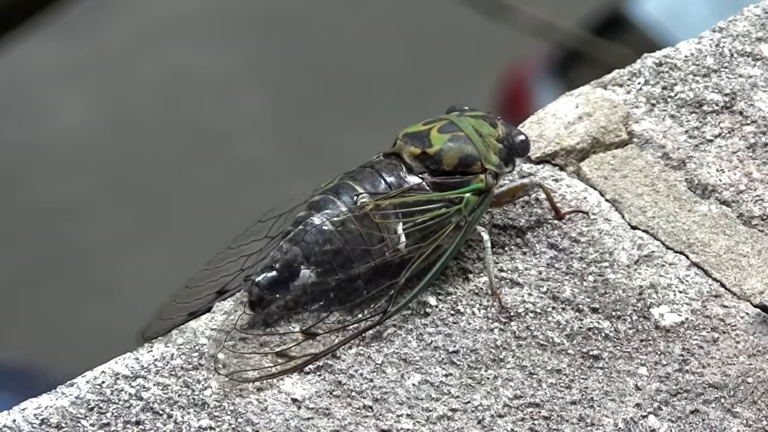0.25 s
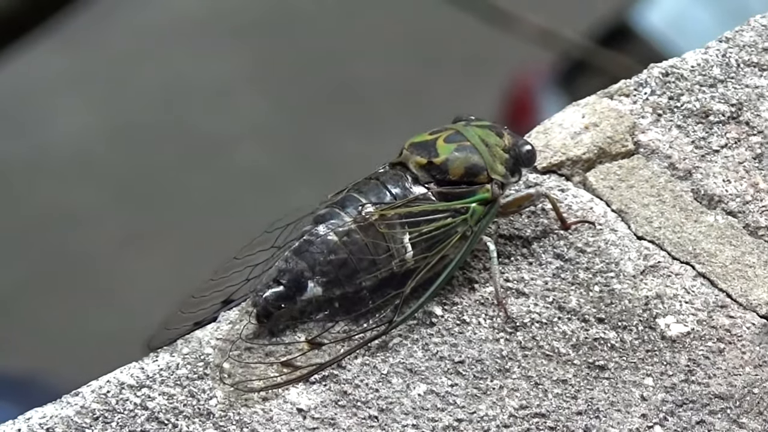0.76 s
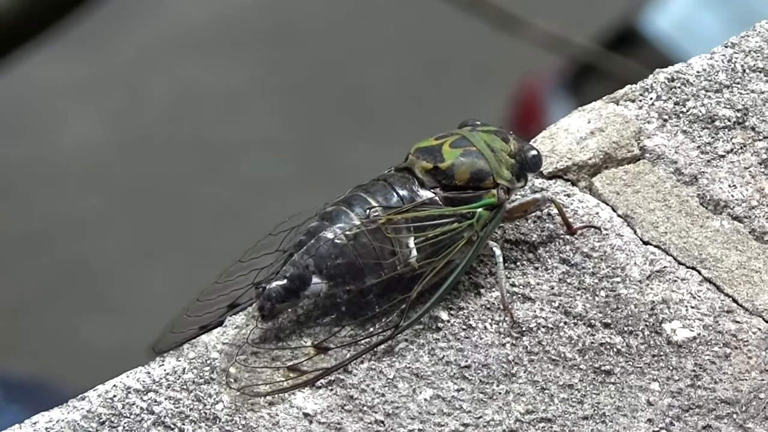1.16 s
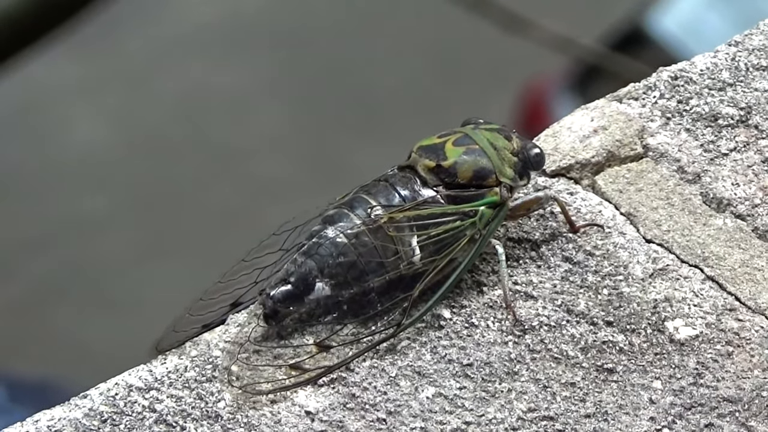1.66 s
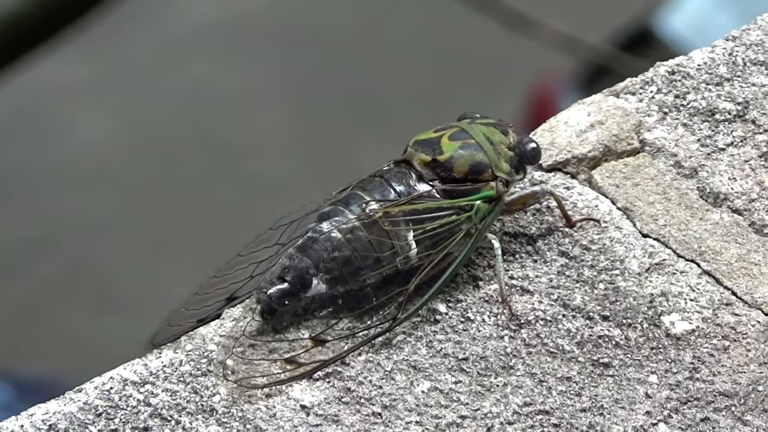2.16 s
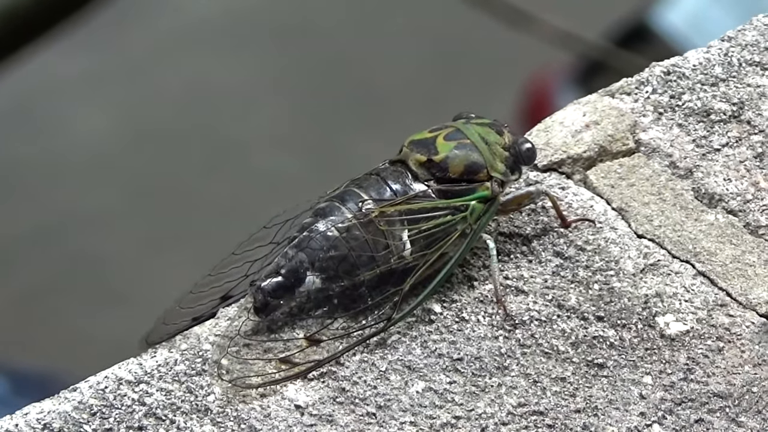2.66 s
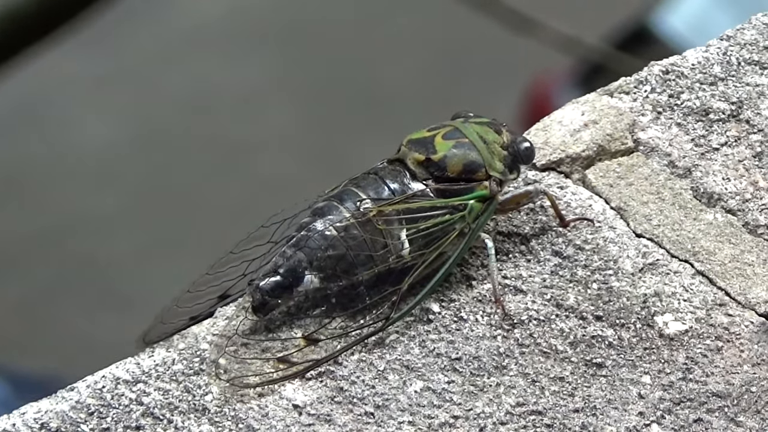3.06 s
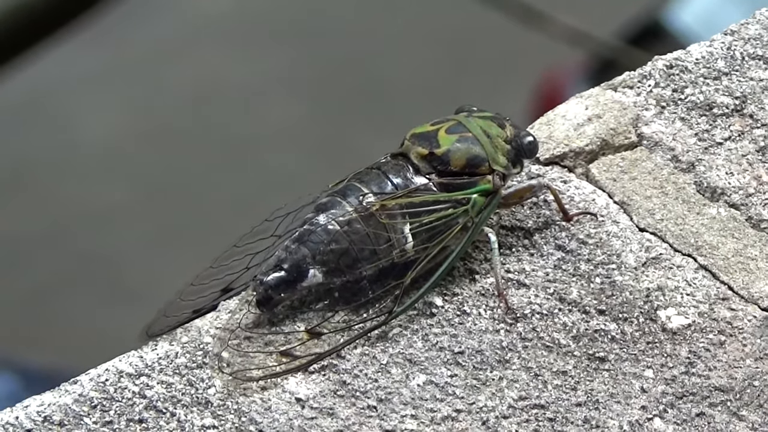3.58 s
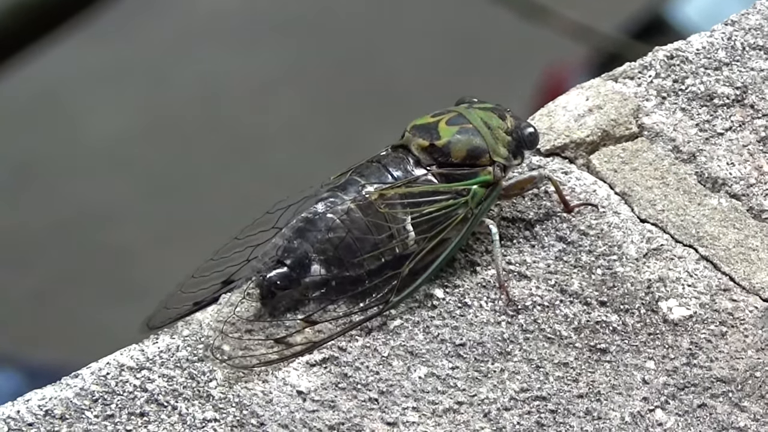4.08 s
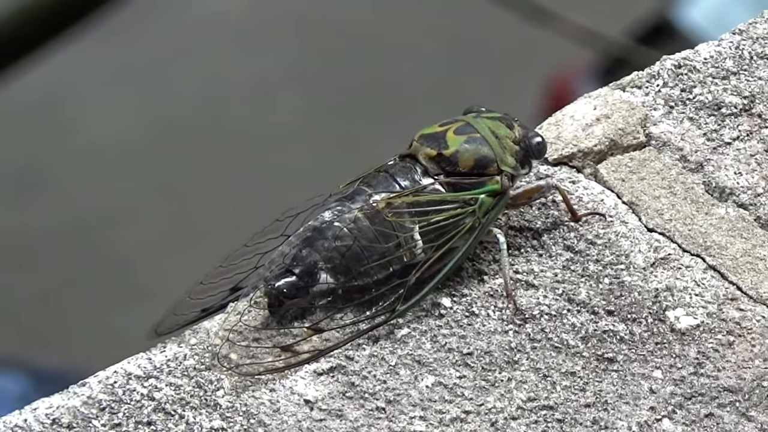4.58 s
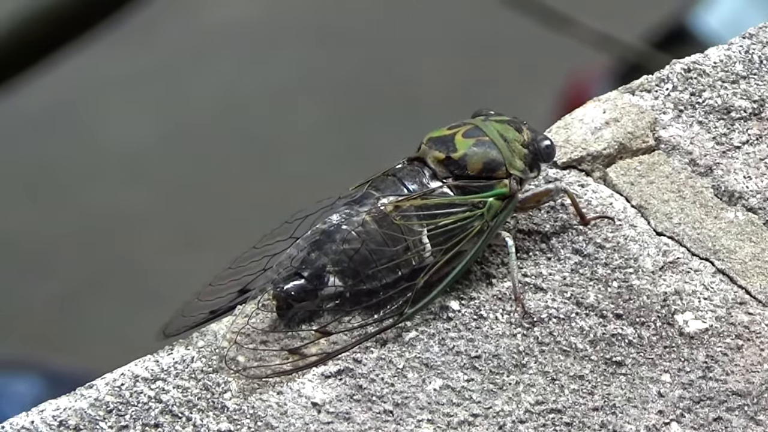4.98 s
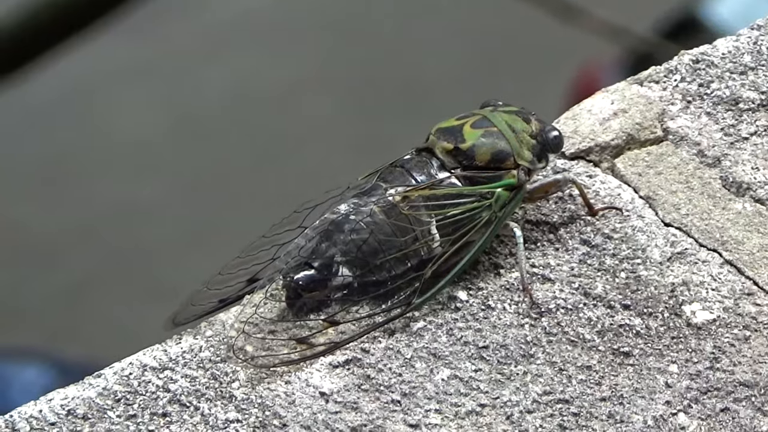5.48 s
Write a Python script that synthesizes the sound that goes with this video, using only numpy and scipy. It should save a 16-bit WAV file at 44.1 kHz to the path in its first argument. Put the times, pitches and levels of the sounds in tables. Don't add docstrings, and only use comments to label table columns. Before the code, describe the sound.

A cicada on a stone ledge buzzes loudly and very close, bright and rasping. For almost three seconds the buzz surges about every 0.7 seconds, then holds as an even drone, sinks slowly and turns rough and stuttering. Stone and nearby walls add a very short reflection. Faint low town rumble, a machine hum and a shimmer of far cicadas lie behind, rising slightly at the end. Close microphone, nearly mono.

```python
import sys
import numpy as np
from scipy import signal
from scipy.fft import rfft, irfft, next_fast_len
from scipy.io import wavfile
from scipy.ndimage import map_coordinates

SR = 44100
rng = np.random.default_rng(int(sys.argv[2]) if len(sys.argv) > 2 else 0)


def master(y):
    cut = np.clip(np.atleast_2d(y).T, -1, 1)
    pcm = np.round(cut * 32767)
    wavfile.write(sys.argv[1], SR, pcm.astype(np.int16))


def boost_factor(decibels):
    exponent = np.asarray(decibels, float) / 20
    return 10 ** exponent


N = 252693


def at(rows, s):
    t, *cols = np.transpose(rows)
    return np.array([np.interp(s, t, c) for c in cols])


def unit(x):
    return x / np.sqrt(np.mean(x ** 2) + 1e-20)


def wobble(rate):
    return map_coordinates(rng.standard_normal(int(N * rate / SR) + 4), [np.arange(N) * rate / SR])


def filtered(x, response):
    m = next_fast_len(N + 8192)
    return irfft(rfft(x, m) * response(np.fft.rfftfreq(m, 1 / SR)), m)[:N]


def resonance(f, centre, width):
    return 1j * f * width / (centre * centre - f * f + 1j * f * width)


# (time [s], buckles of both membranes [1/s])
PACE = [(0, 267.5), (2.55, 266), (2.93, 262), (3.42, 255), (3.5, 247), (3.95, 236), (4.03, 230),
        (4.33, 225), (4.8, 206), (5.1, 201)]
# (time [s], tiredness [0-1], slackening of the ribs [%], effort [dB])
STAMINA = [(0, 0, -1, -0.5), (2.55, 0.03, 0, 0.34), (2.93, 0.01, -4, 0.5), (3.25, 0.22, -3, 0.5),
           (3.3, .35, 0.5, -0.5), (3.87, 0.76, 0, .5), (3.93, 0.9, 0, 0), (4.1, 0.97, -0.5, -.5),
           (4.8, 1, 1, 0.5), (5.03, 1, 1.5, 1), (5.07, 1, 1, -1), (5.4, 1, 1.5, -1), (5.73, 1, 2.5, 0)]
# (time [s], timing scatter [ms], pop-back lag [ms], faltering [0-1])
MUSCLE = [
    (0, .1, 2, 0),
    (2.9, .11, 2.05, 0),
    (3.8, .19, 1.9, 0),
    (4.7, .26, 1.8, 0),
    (4.85, .55, 1.8, .14),
    (5.2, .75, 1.8, .24),
    (5.73, .85, 1.8, .3),
]
# (time of the drop [s], hurry [0-1], height [0-1])
LIFTS = [
    (-.05, 1, 1),
    (.697, 1, 1),
    (1.397, 1, 1),
    (2.125, .95, 1),
    (2.85, .52, .05),
]
# (time from the drop [s], belly lift [0-1], limpness [0-1], slackening [%])
GESTURE = [
    (-.27, 0, 0, 0),
    (-.12, .1, 0, 6),
    (-.075, .5, 0, 6),
    (-.05, 1, 0, .5),
    (-.008, 1, 0, .5),
    (.012, .65, .4, 6),
    (.055, .08, .3, 4),
    (.13, 0, 0, 0),
]
# (time from the drop [s], level [dB])
PUSH = [(-.2, 0), (-.11, -0.5), (-.07, 0.5), (-.045, -1), (-.01, 2), (.015, -1), (.06, -1), (.13, 0)]
STUTTER_LIFT = 0.3
HURRY_PER_S, HURRY_SAG = 64, 0.86
HURRY_RISE_S, HURRY_HOLD_S, HURRY_FALL_S = 0.21, 0.065, 0.045


def body(s):
    pace = at(PACE, s)[0]
    tired, slack, effort = at(STAMINA, s)
    lift = STUTTER_LIFT * at(MUSCLE, s)[2]
    corners = [-HURRY_HOLD_S - HURRY_RISE_S, -HURRY_HOLD_S, 0, HURRY_FALL_S]
    for drop, hurry, height in LIFTS:
        up, limp, loose = at(GESTURE, s - drop)
        pace = pace + hurry * HURRY_PER_S * np.interp(s - drop, corners, [0, 1, HURRY_SAG, 0])
        lift = lift + height * up
        tired = tired + height * limp
        slack = slack + hurry * loose
        effort = effort + height * at(PUSH, s - drop)[0]
    return pace, np.clip(lift, 0, 1), np.clip(tired, 0, 1), np.clip(slack, 0, 12), effort


PAIR_SHARE, PAIR_CLOSES = 0.445, 0.2
TURN_LOST = 0.5


def beats():
    t = np.arange(N) / SR
    falter = at(MUSCLE, t)[2]
    drag = 1 - falter * (0.25 + 0.35 * wobble(14))
    pace = body(t)[0] / 2 * drag
    turns = np.cumsum(pace) / SR
    start = np.interp(np.arange(int(turns[-1]) + 1) + 0.02, turns, t)
    rate = np.interp(start, t, pace)

    scatter_ms, lag_ms, swap = at(MUSCLE, start)
    scatter_ms *= 1 - 0.84 * np.clip((rate - 146) / 11, 0, 1)
    chance = rng.standard_normal((4, len(start)))
    taken = 2 * (rng.random(len(start)) < TURN_LOST * swap)
    far = start + scatter_ms * chance[0] / 1000
    near = start + (PAIR_SHARE - PAIR_CLOSES * swap) / rate + scatter_ms * chance[1] / 1000
    back = (lag_ms + 0.15 * scatter_ms * chance[2:]) / 1000

    times = np.concatenate([far, far + back[0], near, near + back[1]])
    kinds = np.concatenate([taken, taken + 1, 2 + 0 * taken, 3 + 0 * taken])
    return times, kinds, np.tile(rate, 4)


# (belly [dB], pop-back ring [dB], buckle ring [dB], rib crackle [dB])
REST_DB = (-25, -19, -19.5, -23)
LIFT_DB = (6, -3.5, 3.5, 3)
TIRED_DB = (3.5, -4.5, -1.5, -0.5)
SLACK_DB = (-0.14, 0.51, 0.047, -0.67)
STUTTER_DB = (-0.5, -4, -13, 7)


def loudness(s):
    _, lift, tired, slack, effort = body(s)
    controls = [1 + 0 * s, lift, tired, slack, at(MUSCLE, s)[2]]
    return effort + np.transpose([REST_DB, LIFT_DB, TIRED_DB, SLACK_DB, STUTTER_DB]) @ controls


PARTS_HZ = [5150, 6850, 8900]
FINE, LEAD, LENGTH = 8, 48, 256


def shapes(colours):
    f = np.fft.rfftfreq(1024, 1 / SR)
    hz, *cols = np.transpose(colours)
    fall_db = 30 * np.log2(np.clip(f / hz[0], 0.1, 1)) - 60 * np.log2(np.clip(f / hz[-1], 1, 2))
    gain = boost_factor([np.interp(np.log(f + 1), np.log(hz), c) + fall_db for c in cols])

    cepstrum = irfft(np.log(gain))
    cepstrum[:, 1:512] *= 2
    cepstrum[:, 513:] = 0
    phase = 0.5 * rfft(cepstrum).imag
    phase -= np.pi * f ** 2 * 3.2e-8
    rib = np.exp(-2j * np.pi * f * 0.00029)
    phase += np.angle((0.83 + rib) / (1 + 0.83 * rib))
    click = gain * np.exp(1j * phase - 2j * np.pi * f * LEAD / SR)

    below = np.array([0 * f, *[1 / (1 + (f / c) ** 24) for c in PARTS_HZ], 1 + 0 * f])
    parts = irfft(click[:, None] * np.diff(below, axis=0), 1024 * FINE)[..., :2 * LENGTH * FINE]
    return parts / np.sqrt((parts ** 2).sum(axis=(0, 2), keepdims=True) / FINE)


# (time from the drop [s], opening [0-1], ring [Hz])
AIR_GAP = [
    (-.2, 0, 4850),
    (-.14, 0.52, 4940),
    (-.09, 0.5, 4700),
    (-.065, 1, 3710),
    (-.03, 0.14, 3770),
    (.005, 1, 3650),
    (.03, 0.5, 4150),
    (.07, 0.04, 4830),
]
GAP_DB, GAP_T60_S = -20.5, 0.0087


def air_gap(s, since):
    drops = np.transpose(LIFTS)[0]
    nearest = np.abs(s[:, None] - drops).argmin(axis=1)
    drop, _, height = np.transpose(LIFTS)[:, nearest]
    opening, hz = at(AIR_GAP, s - drop)
    age = since.clip(0) / SR
    ring = np.sin(2 * np.pi * hz[:, None] * age) * boost_factor(-60 * age / GAP_T60_S)
    ring /= np.sqrt(GAP_T60_S * SR / 4 / np.log(1000))
    return (height * opening.clip(0) * boost_factor(GAP_DB))[:, None] * ring


# (frequency [Hz], far buckle [dB], far pop-back [dB], near buckle [dB], near pop-back [dB])
AT_REST = [(2190, -37, -27.5, -34, -47), (3140, -7, -18, -10.5, -16.5), (4480, -6, -9, -8, -17),
           (5800, -7.5, -11.5, -11, -4.5), (6580, -5.5, -11, -14.5, -10.5), (7600, 0.5, -24, 5, -14.5),
           (8040, 0.5, -9, 1.5, -5), (8700, -13.5, -10, -8, -24), (9770, -9.5, -39, 3, -12),
           (10300, -44, -54, -6, -12), (11500, -13, -35, -17, -6), (12530, -36, -18, -29, -30),
           (14940, -22, -36.5, -19, -33), (15800, -40.5, -64, -42, -19)]
LIFTED = [(2240, -25.0, -26.5, -22.5, -30.0), (2630, -19.5, -27.0, -20.0, -27.0),
          (3270, -6.5, -20.5, -3.5, -18.0), (3790, -5.0, -15.5, -4.0, -15.5),
          (5300, -16.0, -14.5, -18.5, -13.5), (5990, -9.5, -9.0, -9.5, -9.5),
          (6550, -8.5, -8.0, -10.0, -8.5), (7620, -1.5, -15.0, 0.0, -12.5),
          (8140, -3.0, -16.0, -2.0, -15.5), (9220, -20.5, -19.5, -20.0, -20.5),
          (10080, -14.5, -20.5, -10.5, -25.0), (10900, -7.5, -21.0, -6.5, -23.5),
          (12320, -18.5, -27.5, -20.0, -31.0), (15680, -35.5, -38.5, -36.5, -32.5)]
TIRED = [(2240, -22.5, -26.5, -25.0, -23.0), (3450, -3.5, -14.5, -4.0, -9.5),
         (4440, -1.0, -10.5, -1.0, -14.0), (5170, -12.5, -7.0, -13.5, -7.0), (5940, -4.5, -4.0, -6.5, -6.5),
         (8010, -3.0, -8.5, 0.0, -5.0), (9170, -20.5, -21.5, -12.5, -18.5),
         (9560, -26.5, -18.0, -15.5, -16.5), (10510, -19.0, -19.5, -9.5, -9.0),
         (11500, -23.0, -25.5, -8.0, -23.5), (12830, -20.0, -21.5, -9.5, -20.5),
         (13700, -23.0, -27.5, -18.0, -19.5), (14990, -32.0, -27.0, -26.0, -27.5),
         (15680, -39.0, -38.5, -33.5, -35.0)]
POP_CRACKLE_DB, POP_CRACKLE_TIRED_DB = 1.5, -5


def drum_clicks():
    s, kind, rate = beats()
    _, lift, tired, slack, _ = body(s)
    blend = np.sqrt([(1 - lift) * (1 - tired), lift, (1 - lift) * tired])
    blend /= np.sqrt((blend ** 2).sum(axis=0) + 0.6 * (blend.sum(axis=0) ** 2 - 1))

    chance = rng.standard_normal((6, len(s)))
    size = boost_factor(loudness(s) + 0.5 * chance[0] + 0.7 * chance[1:5]) * np.sqrt(SR / rate)
    size[-1] *= boost_factor((kind % 2 == 1) * (POP_CRACKLE_DB + POP_CRACKLE_TIRED_DB * tired))
    first = np.floor(s * SR).astype(int)
    since = np.arange(LENGTH) - LEAD - (s * SR - first)[:, None]
    grains = ((kind % 2 == 0) * np.sqrt(SR / rate / 2))[:, None] * air_gap(s, since)

    banks = [shapes(colours) for colours in (AT_REST, LIFTED, TIRED)]
    for part in range(4):
        speed = 1 + 0.005 * chance[5] - (part in (0, 3)) * slack / 100
        place = np.rint((LEAD + since * speed[:, None]) * FINE).astype(int).clip(0)
        for share, bank in zip(blend, banks):
            grains += (share * size[part])[:, None] * bank[kind[:, None], part, place]
    where = (first[:, None] + np.arange(LENGTH)).clip(0, N + LEAD)
    return np.bincount(where.ravel(), grains.ravel(), N + LEAD + 1)[LEAD:N + LEAD]


# (frequency [Hz], width [Hz], level [dB])
HOLLOW = [(3440, 550, -7), (3790, 370, -9.5), (4510, 420, -8.5), (4930, 294, -3), (5734, 27, -1.5),
          (7820, 44, -6)]


def hollow_belly(clicks):
    def response(f):
        radiated = 1 / np.sqrt(1 + (2500 / (f + 1)) ** 12)
        return radiated * (1 + sum(boost_factor(db) * resonance(f, c, w) for c, w, db in HOLLOW))
    return filtered(clicks, response)


# (frequency [Hz], width [Hz], depth [0-1])
LEDGE = [(2830, 210, 0.21), (3977, 294, 0.46), (4847, 39, 0.8), (5170, 160, 0.9), (9900, 840, 0.09),
         (11800, 91, 0.2), (14100, 250, 0)]


def ledge(song):
    def response(f):
        dips = [1 - np.clip(depth, 0, 0.95) * resonance(f, c, w) for c, w, depth in LEDGE]
        return np.prod(dips, axis=0)
    return filtered(song, response)


def cicada():
    return ledge(hollow_belly(drum_clicks()))


def walls(x):
    t = np.arange(SR // 5) / SR
    tail = rng.standard_normal(len(t)) * boost_factor(-60 * t / 0.045) * (t > 0.0015)
    wet = signal.fftconvolve(x, tail / np.linalg.norm(tail))[:N]
    return filtered(wet, lambda f: 1 / (1 + 1j * f / 14000))


# (time [s], gain control [dB], machine's own swell [dB], chorus's own swell [dB])
TOWN = [
    (0, 1, 1, 6),
    (1, -1.5, -1.5, -2),
    (2.1, 0, 1, 2),
    (3.3, 0.5, -1.5, 3),
    (4.5, 5.5, -1.5, -2),
    (4.8, 7, 3.5, -1.5),
    (5.3, 6, -1, 0.5),
    (5.73, 9, 1, 2),
]
# (frequency [Hz], level per Hz [dB])
RUMBLE = [(15, -47), (25, -16), (59, -7), (91, -4), (118, -5), (182, -1.5), (411, -6.5), (712, -7.5),
          (1060, -8.5), (1640, -17.5), (2300, -17.5), (2990, -52), (5060, -120)]
# (multiple of 90 Hz, level [dB])
HUM = [(1, 2.5), (2, -10), (2.92, -4.5), (4.6, -4.5), (8.4, -8.5), (11.8, -6.5)]
RUMBLE_DB, HUM_DB = -45, -52.5
LIFT_RUMBLE_DB = 3.5


def town():
    t = np.arange(N) / SR
    gain_db, swell_db, _ = at(TOWN, t)
    rumble_db = RUMBLE_DB + gain_db + LIFT_RUMBLE_DB * body(t)[1]
    hum_db = HUM_DB + gain_db + swell_db
    hz, db = np.transpose(RUMBLE)
    rush = filtered(rng.standard_normal(N), lambda f: boost_factor(np.interp(np.log(f + 1), np.log(hz + 1), db)))
    phase = 2 * np.pi * np.cumsum(90 + 0.286 * wobble(4)) / SR
    hum = sum(boost_factor(level + 0.26 * wobble(6)) * np.sin(k * phase) for k, level in HUM)
    return boost_factor(rumble_db + 1.5 * wobble(10)) * unit(rush) + boost_factor(hum_db + 0.5) * hum


# (frequency [Hz], level per Hz [dB])
CHORUS = [(4200, -60), (5300, -16), (5900, 1), (6600, -6), (7300, -6), (8500, -60)]
CHORUS_DB, CHORUS_SWAY_DB = -31.5, 0.5


def chorus():
    hz, db = np.transpose(CHORUS)
    gain_db, _, swell_db = at(TOWN, np.arange(N) / SR)

    def response(f):
        return boost_factor(np.interp(np.log(f + 1), np.log(hz), db, left=-120, right=-120))
    band = filtered(rng.standard_normal(N), response)
    shimmer_db = CHORUS_SWAY_DB * wobble(3.2) + 1.5 * wobble(40)
    return boost_factor(CHORUS_DB + gain_db + swell_db + shimmer_db) * unit(band)


def scene():
    song = boost_factor(-3.0) * cicada()
    middle = song + boost_factor(-9.5) * walls(song) + town() + chorus()
    apart = boost_factor(-36) * filtered(walls(middle), lambda f: (f > 200) & (f < 11000))
    return np.array([middle + apart, middle - apart])


def low_pass(x):
    return signal.sosfilt(signal.butter(12, 15730, fs=SR, output="sos"), x)


def record(dry):
    mix = dry / (1 + np.abs(dry / 1.02) ** 6) ** (1 / 6)
    return low_pass(mix)


dry = scene()
out = record(dry)
master(out)
```